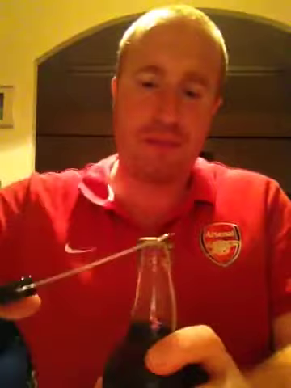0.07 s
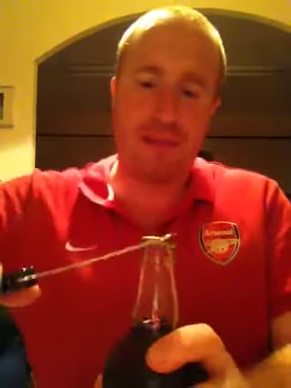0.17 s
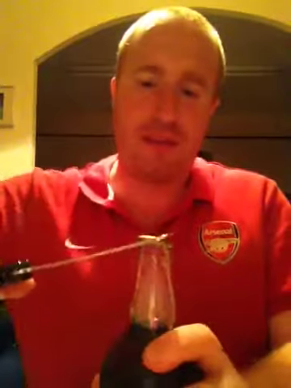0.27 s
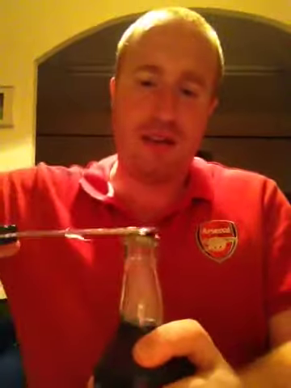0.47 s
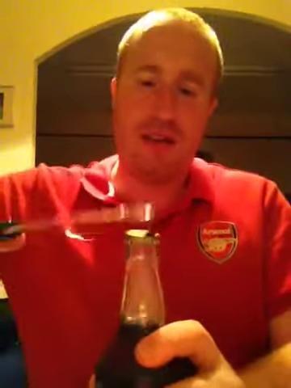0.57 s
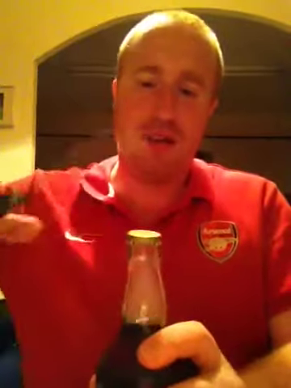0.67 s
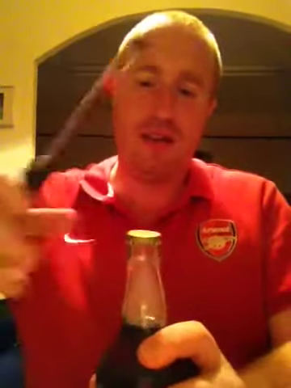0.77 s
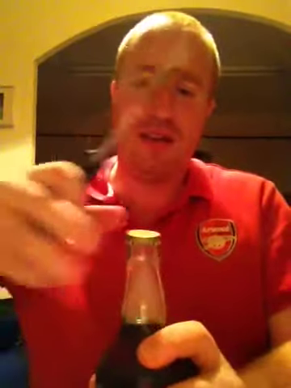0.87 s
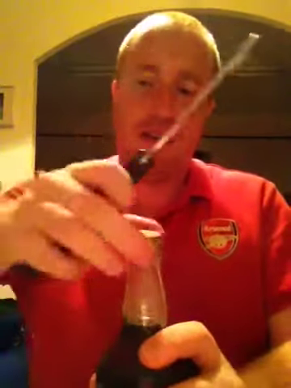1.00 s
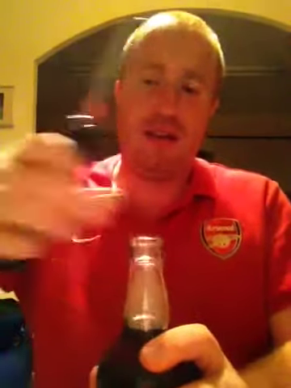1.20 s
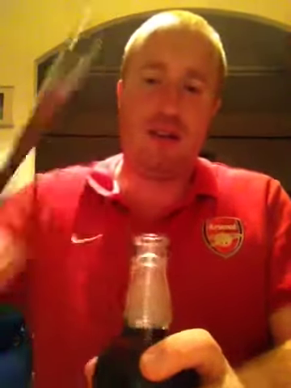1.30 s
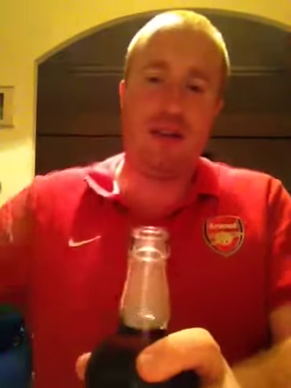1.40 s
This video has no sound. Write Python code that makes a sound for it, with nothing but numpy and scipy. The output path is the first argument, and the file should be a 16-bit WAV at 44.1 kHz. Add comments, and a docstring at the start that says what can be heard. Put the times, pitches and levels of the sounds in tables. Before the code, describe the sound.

A glass bottle is opened close to the microphone in a small quiet room. Gas hisses, the cap snaps free with a pop and a brief metallic ring, then clinks twice on the lip, with a faint fizz between.

```python
"""A crown cap is levered off a glass beer bottle, close up in a small quiet room.
The opener seats with soft knocks and ticks; the room's low standing wave hums on under handling noise.
Gas hisses through the lifting seal, then the crimp snaps free, the opener rings and the neck pops.
The loose cap clinks back on the glass lip, leaks a faint whistle, and clinks again as it is
picked off. One last faint knock of the hand ends it."""
import sys
import numpy as np
from scipy import signal
from scipy.fft import rfft, irfft
from scipy.io import wavfile

SR = 44100
rng = np.random.default_rng(int(sys.argv[2]) if len(sys.argv) > 2 else 0)


def transcribe(u):
    """Save the signal u as a 16-bit wav file named by the first command-line argument.

    u: samples, shape (n,) or (channels, n), limited to [-1, 1]; the rate is SR.
    q: integer samples, one column per channel.
    """
    v = np.clip(np.atleast_2d(u).T, -1, 1)
    q = np.round(v * 32767).astype(np.int16)
    wavfile.write(sys.argv[1], SR, q)


N = 63945


def undb(db):
    """Decibels to gain."""
    return 10 ** (np.asarray(db) / 20)


def at(points, hz):
    """Read (frequency, value) points on a log-frequency axis."""
    freqs, values = np.array(points, float).T
    return np.interp(np.log(np.maximum(hz, 1)), np.log(freqs), values)


def noise(colour, tilt_db=0):
    """Noise of rms 1 with the given colour, tilted in dB per octave."""
    hz = np.maximum(np.arange(N // 2 + 1) * SR / N, 1)
    eq = undb(at(colour, hz) + tilt_db * np.log2(hz))
    x = irfft(rfft(rng.standard_normal(N)) * eq, N)
    return x / x.std()


def since(start):
    """Seconds since a moment, zero before it."""
    return np.maximum(np.arange(N) / SR - start, 0)


def burst(start, decay):
    """Envelope with a hard attack and an exponential fall."""
    t = since(start)
    return (t > 0) * np.exp(-t / decay)


def swell(when, db):
    """Gain along a fader curve, silent outside it."""
    t = since(0)
    return undb(np.interp(t, when, db)) * (t > when[0]) * (t < when[-1])


def wobble(rate):
    """Random values joined by straight lines, rate of them per second."""
    return np.interp(since(0) * rate, np.arange(N), rng.standard_normal(N))


def ring(modes, start, tilt_db=0, pivot_hz=3500):
    """Decaying sines struck together, tilted in dB per octave about the pivot."""
    t = since(start)
    out = 0
    for hz, db, t60 in modes:
        gain = undb(db + tilt_db * np.log2(hz / pivot_hz))
        out = out + gain * np.sin(2 * np.pi * hz * t) * np.exp(-np.log(1000) * t / t60)
    return out


# colour of still air and microphone hiss (frequency [Hz], relative level [dB])
AIR_COLOUR = [(25, -26), (60, -15), (100, -3.5), (220, -2.5), (500, -0.5), (800, -8.5), (1400, 0),
              (2200, -11), (3500, -11.5), (7000, -14), (15200, -16)]

def room_tone(air_db=-64.5, hum_hz=99.6, hum_db=-76):
    """A bed of quiet air with a faint mains hum."""
    return undb(air_db) * noise(AIR_COLOUR) + undb(hum_db) * np.sin(2 * np.pi * hum_hz * since(0))


# length of the reverb tail (frequency [Hz], t60 [s])
TAIL_T60 = [(125, 0.33), (500, 0.2751), (2000, 0.55), (5000, 0.3946), (14000, 0.2568)]
# tone of the reverb tail (frequency [Hz], band gain [dB])
TAIL_EQ = [(125, -12.5), (500, -7), (2000, -11.5), (5000, -6.5), (14000, -5.5)]

def room(x, predelay_s=0.004, early_db=-8, early_decay_s=0.014):
    """Add early reflections, one booming standing wave and a diffuse tail fading band by band."""
    hz = np.maximum(np.arange(N // 2 + 1) * SR / N, 1)
    white = rfft(rng.standard_normal(N))
    early = rng.standard_normal(N) * burst(predelay_s, early_decay_s)
    boom = ring([(142.6, -64.5, 0.54)], predelay_s)  # (frequency [Hz], level [dB], t60 [s])
    response = undb(early_db) * early * np.sqrt(2 / (early_decay_s * SR)) + boom
    for centre in 62.5 * 2 ** np.arange(9):  # octave bands [Hz]
        band = irfft(white * np.maximum(1 - abs(np.log2(hz / centre)), 0), N)
        decay = at(TAIL_T60, centre) / np.log(1000)
        fade = burst(predelay_s, decay) * np.sqrt(2 / (decay * SR))  # unit energy
        response = response + undb(at(TAIL_EQ, centre)) * band * fade
    return x + signal.fftconvolve(x, response)[:N]


# swell of the standing wave and the handling noise (time [s], level [dB])
BOOM_CURVE = [(0.019, -69), (0.038, -50), (.075, -54), (.105, -53.5), (.15, -58), (.22, -67), (.28, -83)]
# colour of the handling noise (frequency [Hz], relative level [dB])
HANDLING_COLOUR = [(60, -36), (130, 3.5), (220, -1.5), (320, -1), (500, -15.5), (1500, -42), (15000, -36)]

def room_boom(mode_hz=142.5, handling_db=-3):
    """The room's low standing wave hums on after the first knocks, with soft handling noise."""
    mode = np.sin(2 * np.pi * mode_hz * since(0))
    return swell(*np.array(BOOM_CURVE).T) * (mode + undb(handling_db) * noise(HANDLING_COLOUR))


# last gas under the resting cap (time [s], whistle pitch [Hz], fizz level [dB])
LEAK_CURVE = [(.62, 11500, -93), (.7, 10400, -73), (0.761, 11600, -70.5), (0.841, 11000, -70),
              (.9, 10200, -74.5), (1.002, 8050, -87), (1.06, 7900, -86)]
# colour of the fizz (frequency [Hz], relative level [dB])
FIZZ_COLOUR = [(1000, -23), (2300, -21), (3600, 15), (5000, 7.5), (6500, -18), (15000, -24)]

def leak(whistle_db=-14, waver_hz=60):
    """Gas seeps under the loose cap: a faint fizz and a thin, wavering whistle."""
    when, hz, db = np.array(LEAK_CURVE).T
    pitch = np.interp(since(0), when, hz) + waver_hz * wobble(rate=130)
    whistle = np.sin(2 * np.pi * np.cumsum(pitch) / SR)
    return swell(when, db) * (noise(FIZZ_COLOUR) + undb(whistle_db) * whistle)


# bumps on the bottle (time [s], level [dB], pitch [Hz], t60 [s], relative rub level [dB])
KNOCK_CUES = [(.011, -42.5, 259, .04, -15.5), (0.0251, -36.5, 279, 0.049, -22.5),
              (0.6751, -42.5, 199.1, 0.035, -18), (1.329, -55.5, 334, 0.05, -2)]
# colour of the rub (frequency [Hz], relative level [dB])
RUB_COLOUR = [(100, -12.5), (400, -3.5), (1500, -4), (4000, -14), (15000, -16)]

def knocks(rub_decay_s=0.0097):
    """Hand and opener bump the bottle: dull, damped thuds with a little rubbing."""
    out = 0
    for start, db, hz, t60, rub_db in KNOCK_CUES:
        rub = undb(rub_db) * burst(start, rub_decay_s) * noise(RUB_COLOUR)
        out = out + undb(db) * (ring([(hz, 0, t60)], start) + rub)
    return out


# cap touching glass (time [s], gain [dB], tilt [dB/octave], scrape trim [dB], favoured pitch [Hz])
CLINK_CUES = [(.0085, -38, -3, 4, 2340), (.021, -35.5, -1, 7, 4200), (.5412, -13, 7, -12, 2480),
              (.5432, -3, 1, 3.5, 2360), (1.061, -37, 2, 4, 3480), (1.0657, -23, -4, 4, 3480),
              (1.0881, -31.5, -2.5, 3.5, 3453)]
# ring of the cap on the lip (frequency [Hz], relative level [dB], t60 [s])
CAP_MODES = [(609.4, -36, 0.11), (2485, -34.5, .085), (2550, -44, 0.2556), (2790, -40.5, 0.047),
             (2912, -38, 0.1), (3484, -32.5, 0.092), (4190, -27.5, 0.053), (4305, -44, 0.1),
             (4994, -26, 0.029), (8050, -40.5, 0.047), (8400, -39, 0.042), (9020, -47, 0.086),
             (9600, -52, 0.036), (12830, -42.5, 0.045), (12900, -39, .015), (15020, -46, 0.032)]
# colour of the scrape (frequency [Hz], relative level [dB])
SCRAPE_COLOUR = [(200, -29), (620, -2), (1000, -7), (2000, -32.5), (2500, 1.5), (3500, 0), (5000, -9),
                 (7200, -6), (8600, 3.5), (10800, -10), (13100, 1), (15500, -7.5)]

def clinks(scrape_db=-25.5, scrape_decay_s=0.0044, favour_db=4.5, favour_octaves=0.13):
    """Each touch of the cap scrapes and rings; the contact point lifts the modes near one pitch."""
    out = 0
    for start, db, tilt, trim_db, favoured_hz in CLINK_CUES:
        scrape = undb(scrape_db + trim_db) * burst(start, scrape_decay_s) * noise(SCRAPE_COLOUR, tilt)
        modes = []
        for hz, level, t60 in CAP_MODES:
            closeness = np.exp(-(np.log2(hz / favoured_hz) / favour_octaves) ** 2)
            modes.append((hz, level + favour_db * closeness, t60))
        out = out + undb(db) * (scrape + ring(modes, start, tilt))
    return out


# swell of the gas escaping under the seal (time [s], level [dB])
FLOW_CURVE = [(.163, -55.5), (0.169, -52), (.181, -36), (0.196, -29.5), (0.214, -25), (0.23, -21),
              (.253, -20.5), (0.274, -29), (0.296, -44), (.33, -56), (.378, -62.5)]
# colour of the jet (frequency [Hz], relative level [dB])
JET_COLOUR = [(88, -67), (150, -30.5), (229, -22.5), (569, -35.5), (1710, -26), (2420, -21.5), (3300, -16),
              (3570, -16.5), (7440, -11), (8350, -6.5), (10900, -7.5), (14300, -1), (15200, -6.5)]
# whistles of the narrow gap (frequency [Hz], bandwidth [Hz], level against the jet [dB])
GAP_WHISTLES = [(11500, 140, -18), (12920, 120, -18), (14245, 70, -15), (14550, 160, -18),
                (14810, 110, -15)]

def hiss(sputter_db=0.6):
    """A bright, sputtering jet with faint whistles swells as the seal lifts and dies with the pressure."""
    jet = noise(JET_COLOUR)
    for hz, width, db in GAP_WHISTLES:
        whistle = signal.lfilter(*signal.iirpeak(hz, hz / width, fs=SR), rng.standard_normal(N))
        jet = jet + undb(db) * whistle / whistle.std()
    sputter = undb(sputter_db * wobble(rate=230))
    return jet * swell(*np.array(FLOW_CURVE).T) * sputter


# the crimp jumping the lip (time [s], gain [dB], decay [s], tilt [dB/octave])
SNAP_CUES = [(0.3794, -18.5, 0.0024, -1), (0.3837, -8.5, .0028, -1.5), (0.3865, -12, 0.0046, -1.6),
             (.3934, -12, 0.0034, 8.5)]
# colour of a crack (frequency [Hz], relative level [dB])
CRACK_COLOUR = [(290, -43), (500, -1), (898, -17.5), (1050, -15), (1200, -21), (1730, -8.5), (3070, -13.5),
                (3590, -3.5), (4780, -9), (6270, -10), (7340, -20.5), (8460, -8.5), (10200, -18.5),
                (14400, -10.5), (15200, -23)]
# ring of the steel opener and the bottle (frequency [Hz], level [dB], t60 [s])
OPENER_MODES = [(1622, -36, 0.32), (1740, -33, 0.12), (2644, -26.5, 0.13), (2625, -29.5, 0.12),
                (3572, -29.5, .14), (3777, -26.5, 0.072), (4420, -29.5, 0.14), (5020, -39.5, .28),
                (6610, -32.5, 0.343), (8600, -32.5, .06), (8560, -42, .18), (9110, -36.5, 0.1995),
                (12800, -37.5, 0.1), (14240, -31.5, .09)]

def snap(attack_s=0.00012, ring_start_s=0.3845):
    """The crimp lets go in four quick cracks; opener and bottle ring."""
    cracks = 0
    for start, db, decay, tilt in SNAP_CUES:
        envelope = burst(start, decay) - burst(start, attack_s)
        cracks = cracks + undb(db) * envelope * noise(CRACK_COLOUR, tilt)
    return cracks + ring(OPENER_MODES, ring_start_s)


# body of the pop: the neck and the low room modes it wakes (frequency [Hz], level [dB], t60 [s])
POP_MODES = [(140.9, -32.5, 0.42), (201.9, -29, .28), (244.4, -14, 0.086), (284, -12.5, 0.1),
             (316.3, -20.5, .17), (354.2, -15, 0.071), (387.6, -17, 0.12), (445, -16.5, 0.049),
             (540, -20.5, .14), (607, -31.5, 0.13), (732, -34, 0.19), (845, -37.5, .13), (1116, -33, 0.06)]
# colour of the puff of gas (frequency [Hz], relative level [dB])
PUFF_COLOUR = [(25, -44), (60, -21), (110, -4), (250, -4.5), (420, -6), (700, -22.5), (1200, -37.5),
               (3000, -54)]

def pop(start_s=0.3825, attack_s=0.0022, puff_db=-17.5, puff_decay_s=0.016):
    """The remaining gas leaves at once in a dark puff that sets the neck ringing."""
    puff = undb(puff_db) * burst(start_s, puff_decay_s) * noise(PUFF_COLOUR)
    attack = 1 - np.exp(-since(start_s) / attack_s)
    return (ring(POP_MODES, start_s) + puff) * attack


def scene():
    """Mono mix: hiss and hits go through the reverb; room boom, leak and room tone bypass it."""
    foreground = hiss() + snap() + pop() + clinks() + knocks()
    return (room(foreground) + room_boom() + leak() + room_tone())[None]


def record(dry, low_cut_hz=97, high_cut_hz=15230):
    """Roll off the deep bass and cut the top steeply."""
    low_cut = signal.butter(3, low_cut_hz, "high", fs=SR, output="sos")
    high_cut = signal.ellip(10, 0.2, 75, high_cut_hz, fs=SR, output="sos")
    return signal.sosfilt(high_cut, signal.sosfilt(low_cut, dry))


dry = scene()
out = record(dry)
transcribe(out)
```